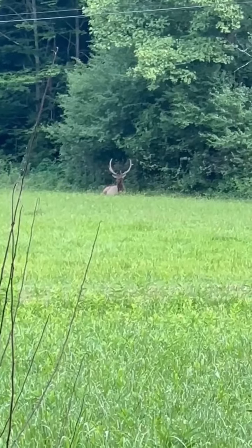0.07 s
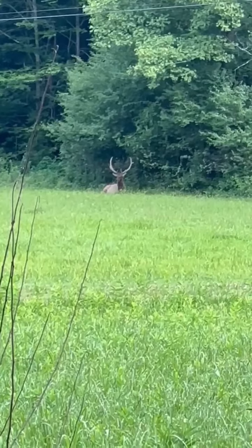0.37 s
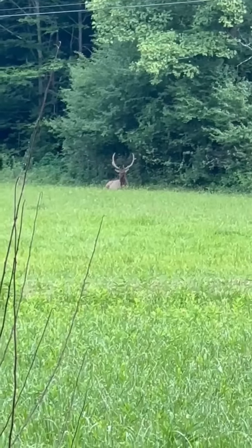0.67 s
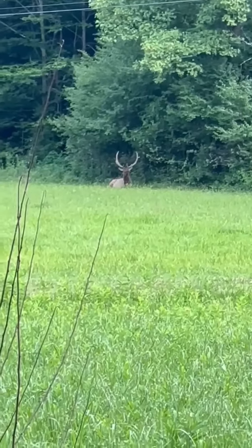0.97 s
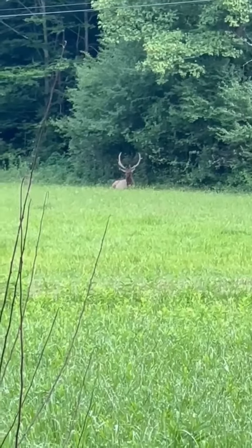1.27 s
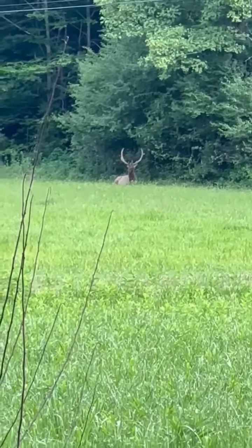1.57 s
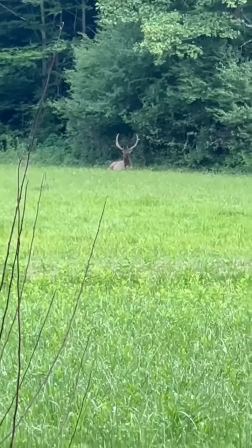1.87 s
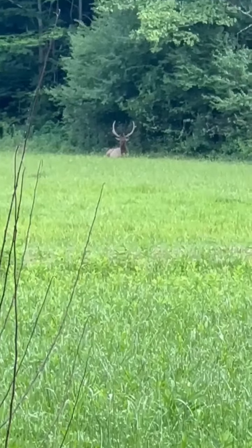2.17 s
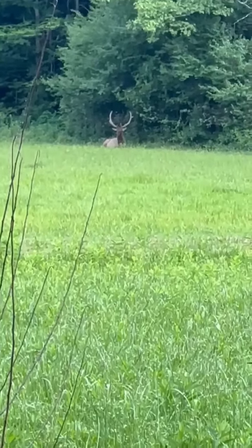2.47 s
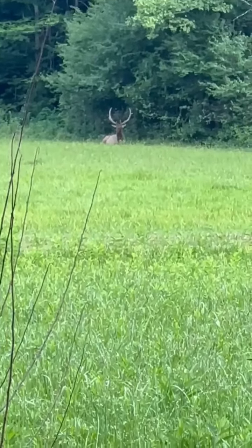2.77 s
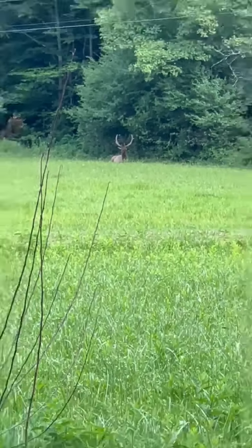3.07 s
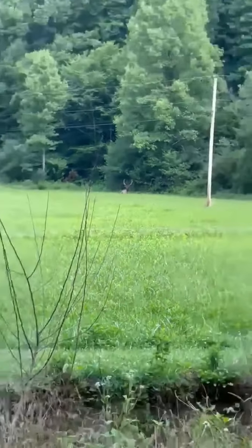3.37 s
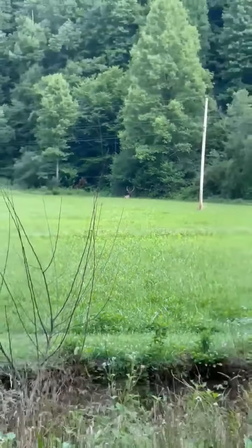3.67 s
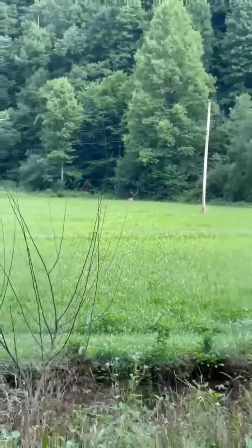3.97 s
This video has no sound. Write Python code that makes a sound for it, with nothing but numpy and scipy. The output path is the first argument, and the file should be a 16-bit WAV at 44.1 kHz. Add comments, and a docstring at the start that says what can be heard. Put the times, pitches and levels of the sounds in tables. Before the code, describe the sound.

Tyre roar builds as a vehicle drives past and rumbles off, over a low idling throb.

```python
"""A low, lumpy throb and a roar of approaching tyres, over the wash of a distant road.
The throb is an engine idling beside a field, its harmonics beating together. The tyres roar and drone,
surging with each turn of the wheels, and hiss at the closest point. The vehicle's draught buffets
the microphone, then its exhaust rumbles and rises in pitch as it pulls away.
A phone's two close ports hear the pass with small differences of level and phase."""
import sys
import numpy as np
from scipy import signal
from scipy.fft import rfft, irfft
from scipy.io import wavfile
from scipy.ndimage import uniform_filter1d

SR = 44100
rng = np.random.default_rng(int(sys.argv[2]) if len(sys.argv) > 2 else 0)


def store_wav(level_fs):
    """Save 16-bit WAV to argv[1]."""
    pcm = np.round(np.clip(np.atleast_2d(level_fs), -1, 1) * 32767)
    wavfile.write(sys.argv[1], SR, pcm.T.astype(np.int16))


N = 176400


def undb(db):
    """Amplitude ratio of a level in decibels."""
    return 10 ** (np.asarray(db) / 20)


def unit(x):
    """Normalisation to an rms of 1."""
    return x / np.sqrt(np.mean(np.abs(x) ** 2))


def curve(rows, column=1):
    """Linear interpolation of a table column over time."""
    rows = np.array(rows, float)
    return np.interp(np.arange(N) / SR, rows[:, 0], rows[:, column])


def colour(rows, column=1):
    """Linear interpolation of a table column over log frequency."""
    rows = np.array(rows, float)
    return np.interp(np.log(np.fft.rfftfreq(N, 1 / SR) + 1), np.log(rows[:, 0]), rows[:, column])


def wander(rate_hz):
    """Slow random modulation of rms 1: values held for 1 / rate_hz seconds and smoothed twice."""
    hold = int(SR / rate_hz)
    steps = np.repeat(rng.standard_normal(N // hold + 1), hold)
    return unit(uniform_filter1d(uniform_filter1d(steps, hold), hold)[:N])


def running_phase(hz):
    """Phase in radians as the time integral of frequency."""
    return 2 * np.pi * np.cumsum(hz) / SR


def noise(spectrum):
    """Spectral shaping of white noise: two incoherent signals with a joint rms of 1."""
    white = rng.standard_normal((2, N))
    return unit(irfft(rfft(white) * undb(colour(spectrum)), N))


def swell(spectrum, levels, flicker_db):
    """Amplitude modulation: a noise pair follows a level curve and flickers with the road surface."""
    return noise(spectrum) * undb(curve(levels) + flicker_db * wander(10))


def resonance(track, width_hz):
    """Narrow-band noise: a low-passed pair is shifted to a gliding centre frequency and level."""
    lowpass = 1 / np.sqrt(1 + (np.fft.fftfreq(N, 1 / SR) / (width_hz / 2)) ** 4)
    white = rng.standard_normal((2, N)) + 1j * rng.standard_normal((2, N))
    envelope = np.fft.ifft(np.fft.fft(white) * lowpass)
    carrier = np.exp(1j * running_phase(curve(track)))
    return unit((envelope * carrier).real) * undb(curve(track, column=2))


def respond(x, response, half=2048):
    """Linear filtering: convolution with the windowed impulse response of each row of response."""
    length = 2 * half + 1
    taps = np.roll(irfft(response, N), half, axis=-1)[:, :length] * np.hanning(length)
    padded = np.pad(x, half, mode="reflect", reflect_type="odd")
    return signal.fftconvolve(padded[None], taps, mode="full")[:, 2 * half:2 * half + N]


def road():
    """Far traffic adds up to stationary noise, a steady wash."""
    # traffic spectrum: f/Hz, relative level/dB
    spectrum = [(20, -18.5), (42, -16), (80, 1.5), (140, -2.5), (230, -5), (340, -10.5), (600, -16.5),
                (900, -11.5), (1150, -14.5), (1600, -14.5), (2000, -22), (2700, -26), (4000, -40.5),
                (6800, -54), (8500, -73), (11500, -77)]
    return noise(spectrum) * undb(-43.5)


def idle():
    """Harmonics of one slightly unsteady engine cycle beat into a throb; pipe dispersion evens it out."""
    # engine orders: multiple of the cycle rate, relative level/dB
    orders = [(2, -14.5), (4, -4), (5, -1.5), (6, -3.5), (7, -15), (8, -7.5), (10, -21), (16, -17.5)]
    cycle_hz, wobble, flutter_db, dispersion_rad = 14.4, 0.004, 1.33, 1.2
    phase = running_phase(cycle_hz * (1 + wobble * wander(3.93)))
    throb = np.zeros(N)
    for order, db in orders:
        tone = np.sin(order * phase + dispersion_rad * order ** 2)
        uneven_firing = undb(flutter_db * wander(7.2))
        throb += undb(db) * unit(tone * uneven_firing)
    return undb(-37.5) * unit(throb)


def fizz():
    """Partial coherence: a faint, flickering top hiss is part in phase, part in antiphase at the ports."""
    # hiss spectrum: f/Hz, relative level/dB
    spectrum = [(3800, -40), (4400, -1.5), (6600, 2), (8200, -0.5), (10000, -0.5), (11000, -8.5)]
    # hiss envelope: t/s, level/dB
    levels = [(0, -80), (.9, -79), (1.35, -74), (1.7, -71.5), (2.1, -78.5), (2.7, -74), (3, -70),
              (3.3, -72), (4, -77)]
    # filter on the in-phase part: f/Hz, gain/dB
    shared_gain = [(7500, 2.5), (8700, -4), (10000, -11)]
    flicker_db = 1.6
    shared, apart = noise(spectrum) * undb(curve(levels) + flicker_db * wander(36))
    return respond(shared, undb(colour(shared_gain))[None]) + np.array([apart, -apart])


def draught():
    """Air displaced by the vehicle makes a wide whoosh, then one low buffet on each port separately."""
    # whoosh spectrum: f/Hz, relative level/dB
    whoosh_spectrum = [(180, -20.5), (340, 1), (550, 6), (750, 0.5), (1000, 0), (1400, -14), (1900, -60)]
    # whoosh envelope: t/s, level/dB
    whoosh_levels = [(2.45, -72), (2.65, -51), (2.76, -53), (2.889, -40.5), (3, -49.5), (3.11, -43.5),
                     (3.25, -56.5), (3.6, -59), (4, -76)]
    # buffet spectrum: f/Hz, relative level/dB
    buffet_spectrum = [(25, -20), (60, 8), (130, -4), (220, -2), (350, -16), (800, -63.5)]
    buffet_s, half_width_s = 3.105, 0.059
    shared, apart = swell(whoosh_spectrum, whoosh_levels, flicker_db=2.0)
    whoosh = undb(-5.5) * shared + np.array([apart, -apart])
    puff = undb(-40) * np.exp(-((np.arange(N) / SR - buffet_s) / half_width_s) ** 2)
    return whoosh + noise(buffet_spectrum) * puff


def wake():
    """Broadband noise and resonances: the body booms and rushes, then exhaust gas rumbles behind it."""
    # low boom as the vehicle draws level and just after: t/s, f/Hz, level/dB
    boom = [(0, 149.4, -85.5), (1.5, 150.4, -63), (2.3, 160.3, -53), (2.55, 182.5, -39.5), (2.8, 191, -62),
            (3.2, 200, -56), (3.29, 205, -37.5), (3.55, 189, -64)]
    # hollow ring of the departing vehicle: t/s, f/Hz, level/dB
    hollow = [(0, 450, -78.5), (3.1, 450.5, -65), (3.35, 439.5, -56), (3.67, 449.6, -49.5), (4, 455, -55.5)]
    # spectra of body rush and exhaust rumble: f/Hz, relative level/dB
    rush_spectrum = [(100, 0), (160, 6), (330, -2.5), (460, -2.5), (650, -3.5), (1000, -8.5), (1800, -17.5),
                     (3000, -27), (4500, -33), (7500, -48), (10000, -68.5)]
    rumble_spectrum = [(20, -23), (38, -5), (68, 5), (92, -3), (125, -8.5), (200, -14.5), (300, -27),
                       (600, -64.5), (3000, -93)]
    # their envelopes: t/s, level/dB
    rush_levels = [(0, -73.5), (1.2, -51), (1.75, -43.5), (2.4, -44.5), (2.75, -44), (2.981, -41),
                   (3.25, -42.5), (3.6, -44), (4, -50.5)]
    rumble_levels = [(0, -68), (1.6, -57.5), (2.5, -56), (2.77, -43.5), (2.879, -33), (2.97, -36),
                     (3.04, -30), (3.11, -29), (3.18, -37), (3.31, -32), (3.6, -45), (4, -40.5)]
    rings = resonance(boom, width_hz=29) + resonance(hollow, width_hz=115)
    rush = swell(rush_spectrum, rush_levels, flicker_db=1.36)
    rumble = swell(rumble_spectrum, rumble_levels, flicker_db=1.1)
    return rush + rumble + rings


def exhaust():
    """A harmonic series on the firing rate rises in pitch; a pipe resonance swells the third harmonic."""
    # exhaust note: t/s, firing rate f/Hz, fundamental level/dB, third harmonic level/dB
    track = [(0, 44.1, -80, -90), (1.7, 44.06, -56.5, -63.5), (2.25, 43.15, -50.5, -46.5),
             (2.85, 41.16, -46, -57), (3.1, 41.55, -40, -56), (3.28, 42.93, -29, -39.5),
             (3.42, 44.96, -30.5, -35.5), (3.58, 48.42, -34.5, -42), (3.8, 49.7, -36, -57),
             (4, 50.22, -45, -46)]
    # weaker harmonics: multiple of the firing rate, level/dB relative to the fundamental
    orders = [(2, -14.5), (4, -20), (5, -18), (6, -20.5), (10, -27)]
    wobble = 0.0063
    phase = running_phase(curve(track) * (1 + wobble * wander(14)))
    overtones = sum(undb(db) * unit(np.sin(order * phase)) for order, db in orders)
    note = (unit(np.sin(phase)) + overtones) * undb(curve(track, column=2))
    third = unit(np.sin(3 * phase)) * undb(curve(track, column=3))
    return note + third


def wheel_surge(depth_db, lag_s=0):
    """Periodic amplitude modulation: a gain that rises and falls once in each turn of the wheels."""
    wheel_hz, peak_s = 3.056, 1.29
    return undb(depth_db * np.cos(2 * np.pi * wheel_hz * (np.arange(N) / SR - peak_s - lag_s)))


def tyres():
    """Rolling noise: the tread roars, whines and drones on the approach and hisses when closest."""
    # spectra of tread roar and hiss: f/Hz, relative level/dB
    roar_spectrum = [(150, -10.5), (350, -4), (500, -3), (700, -1), (850, 4), (980, 5), (1100, -2),
                     (1450, -5.5), (1900, -19.5), (3000, -30), (6000, -36.5), (8500, -64), (10500, -74)]
    hiss_spectrum = [(500, -8), (1000, -1.5), (1500, 2.5), (2000, -4), (2800, -7.5), (3600, -17.5),
                     (5000, -24), (7200, -25.5), (8500, -48.5), (11000, -68)]
    # their envelopes: t/s, level/dB
    roar_levels = [(0, -47.5), (.5, -47), (.8, -42.5), (1.08, -42), (1.25, -41), (1.6, -42.5), (1.95, -42),
                   (2.3, -43.5), (2.55, -44.5), (2.72, -50.5), (3.35, -57.5), (3.699, -51.5), (3.92, -47),
                   (4, -48)]
    hiss_levels = [(0, -59), (.7, -59.5), (1.15, -54.5), (1.55, -48.5), (1.95, -49), (2.35, -48.5),
                   (2.7, -60), (3, -53), (3.4, -66), (3.85, -54.5)]
    # whine and low drone of the tread: t/s, f/Hz, level/dB
    whine = [(0, 907, -58), (.55, 910, -50), (.85, 914, -50), (1.05, 910, -52), (1.25, 928, -41.5),
             (1.6, 902, -55), (1.93, 871.6, -42.5), (2.2, 871, -54.5), (2.7, 844, -62.5),
             (3.6, 947.5, -64.5), (3.95, 1010, -55)]
    drone = [(0, 236, -73), (.45, 234, -67), (.65, 230, -50), (1.1, 228, -42.5), (1.5, 234, -47),
             (2.1, 230, -41.5), (2.5, 222, -42), (2.75, 214, -45), (3, 206.3, -42), (3.3, 198, -41.5),
             (3.65, 174, -42), (4, 200.8, -48)]
    # band of hiss that sinks as the vehicle draws level: t/s, f/Hz, level/dB
    swish = [(0, 3300, -89), (1.25, 3100, -76), (1.65, 2751, -67), (2.12, 2152, -55), (2.38, 1620, -51),
             (2.66, 1565, -52), (2.85, 1476, -65), (4, 1137, -73)]
    roar = swell(roar_spectrum, roar_levels, flicker_db=1.2) + resonance(whine, width_hz=110)
    hiss = swell(hiss_spectrum, hiss_levels, flicker_db=0.87) + resonance(swish, width_hz=340)
    pulsing_drone = resonance(drone, width_hz=54) * wheel_surge(depth_db=2, lag_s=0.065)
    return (roar + hiss) * wheel_surge(depth_db=0.28) + pulsing_drone


def ports(shared, diffuse):
    """Midrange phase and level differences: the left port leads at first, the right is louder after."""
    # port response: f/Hz, diffuse gain/dB, left minus right on the approach/dB,
    # left phase lead on the approach/rad, left minus right after the pass/dB
    response = [(60, -40, 0, 0, 0), (140, -28, -.1, 0, -.2), (220, -20, -1.5, .05, -1.2),
                (330, -14, -2.6, .3, -2), (500, -11, -2, .55, -3), (680, -10.5, -2.2, .85, -4),
                (860, -12.5, -2.1, 1.3, -3.5), (1030, -11.5, 1.8, 1.5, -1.8), (1170, -10, 4, 1.1, -1.5),
                (1330, -13, 1.4, .4, -.8), (1600, -18, .3, .05, -.3), (1950, -48, 0, 0, 0)]
    pass_s, crossfade_s = 3.13, 0.26
    diffuse_db, coming_db, lead_rad, going_db = (colour(response, column) for column in (1, 2, 3, 4))
    side = np.array([[1], [-1]])  # left, right
    coming = respond(shared, undb(side * coming_db / 2) * np.exp(.5j * side * lead_rad))
    going = respond(shared, undb(side * going_db / 2))
    spread = respond(diffuse, side * undb(diffuse_db))
    gone = (1 + np.tanh((np.arange(N) / SR - pass_s) / crossfade_s)) / 2
    return (1 - gone) * coming + gone * going + spread


def scene():
    """Superposition at the two ports of road and vehicle noise, both engines, draught and top hiss."""
    shared, diffuse = road() + tyres() + wake()
    return ports(shared + idle() + exhaust(), diffuse) + draught() + fizz()


def record(dry):
    """Band limiting: the phone cuts the top with a steep low-pass filter."""
    cutoff_hz = 11000
    lowpass = signal.ellip(8, .1, 50, cutoff_hz, fs=SR, output="sos")
    return signal.sosfiltfilt(lowpass, dry)


dry = scene()
out = record(dry)
store_wav(out)
```